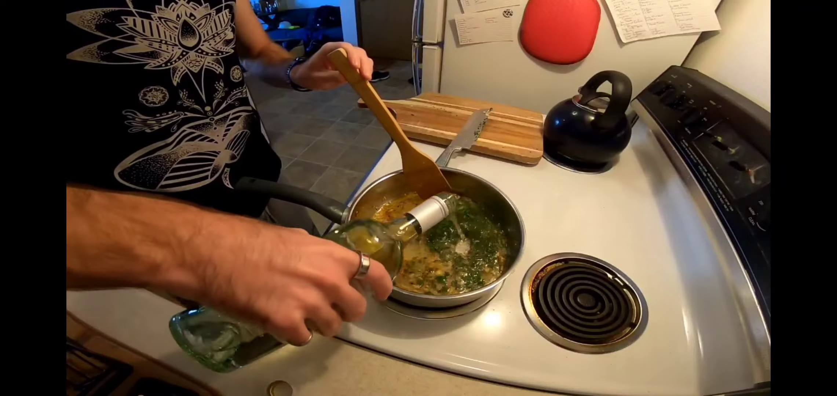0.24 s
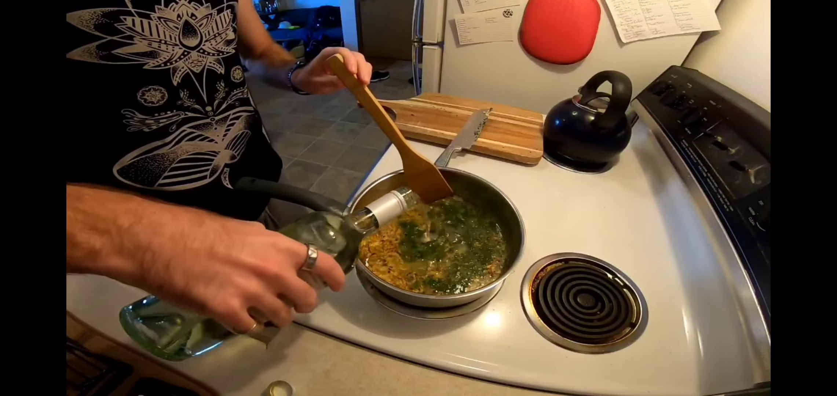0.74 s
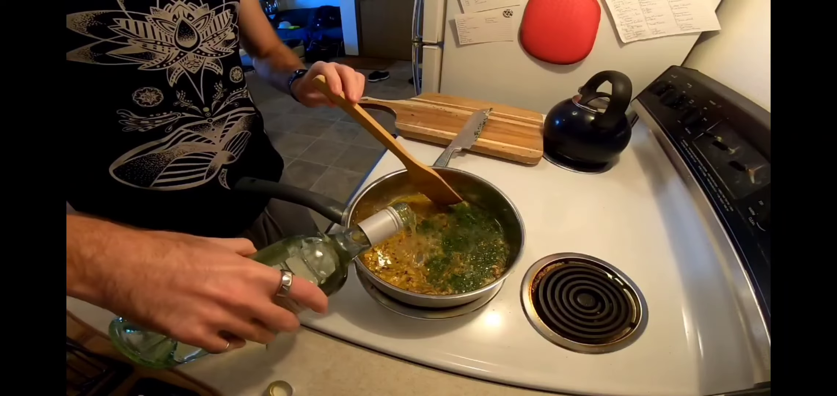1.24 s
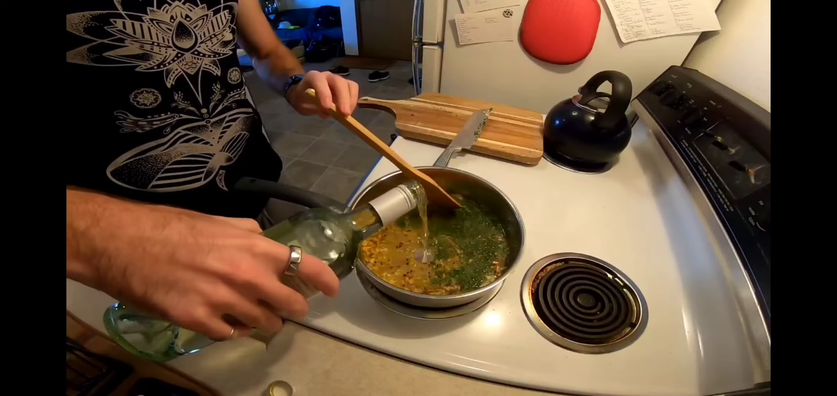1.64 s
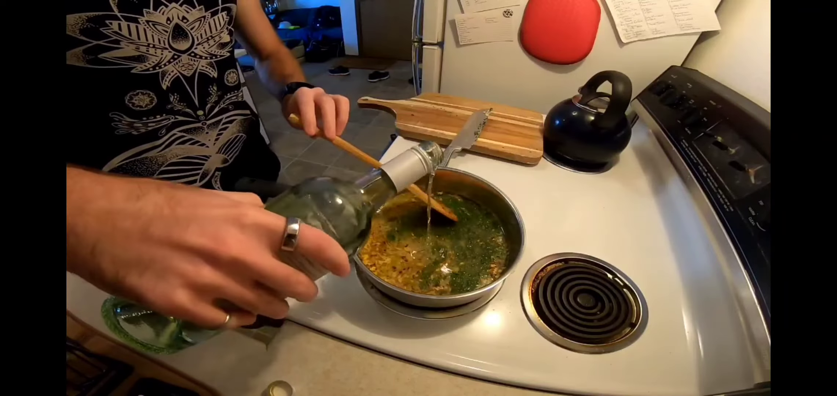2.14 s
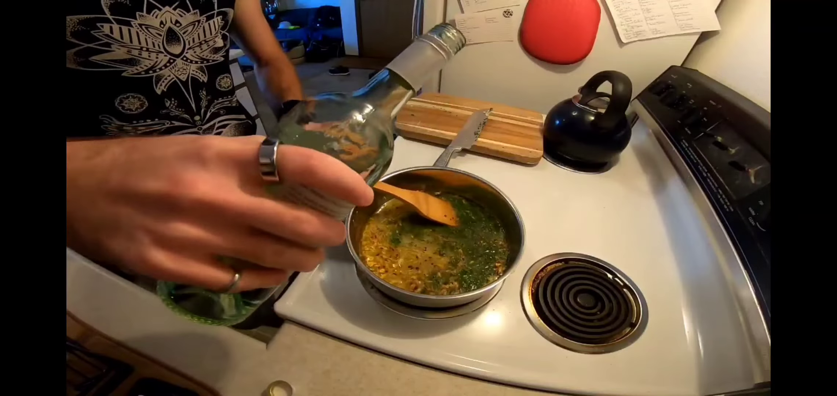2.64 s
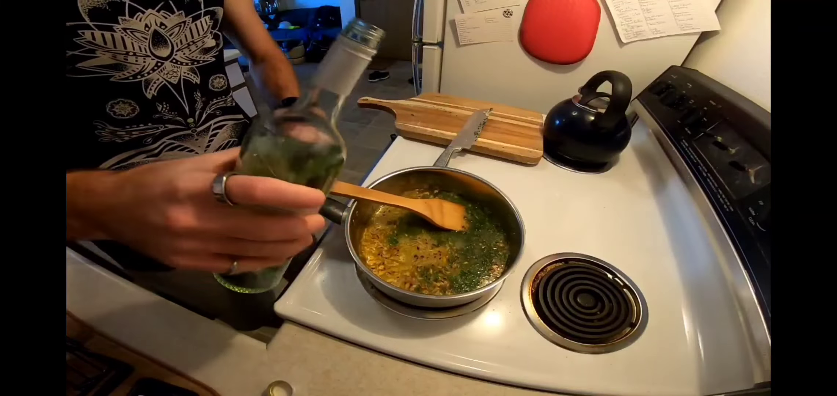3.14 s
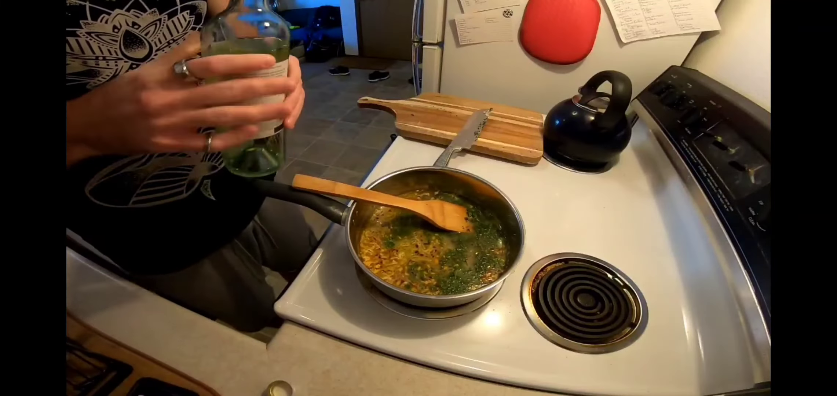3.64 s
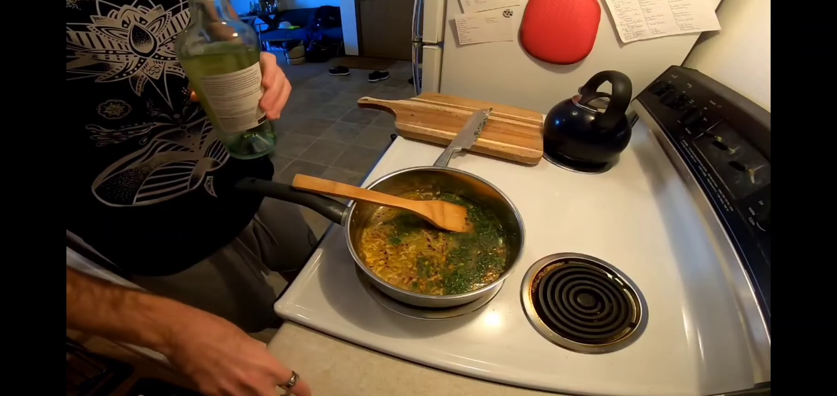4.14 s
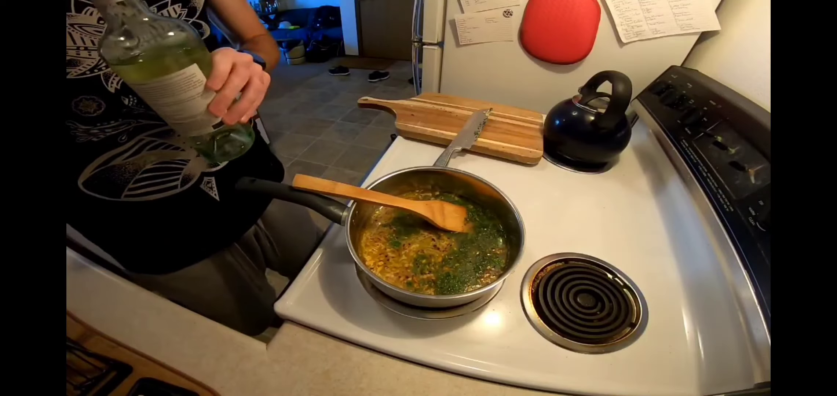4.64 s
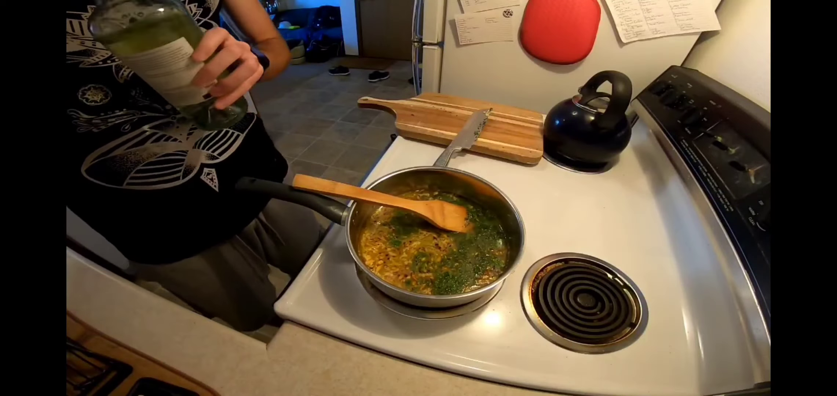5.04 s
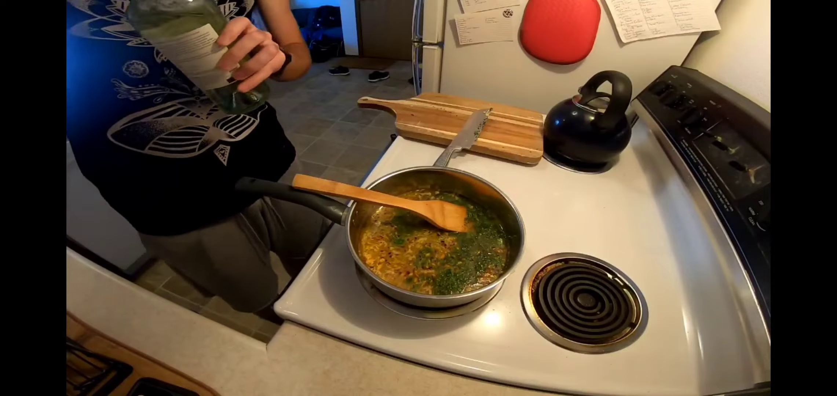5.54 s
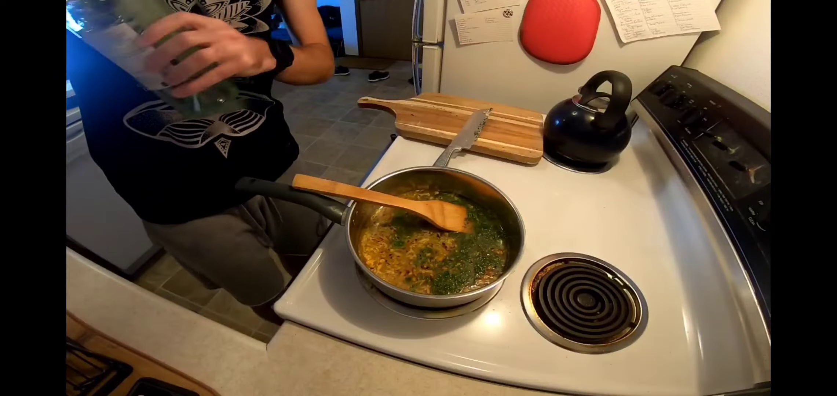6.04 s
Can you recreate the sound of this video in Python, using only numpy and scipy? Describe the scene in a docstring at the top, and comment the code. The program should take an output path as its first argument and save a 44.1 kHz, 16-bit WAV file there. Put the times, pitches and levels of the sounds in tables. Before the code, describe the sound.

Close by in a small kitchen, wine glugs from a glass bottle and splatters into a pan with bubbly plops. The pour stops and a wooden spoon clunks onto the pan, which rocks briefly. After faint handling of the glass and a scuff on the counter, a metal cap clinks sharply onto the bottle and is screwed shut in short, scraping, ticking turns.

```python
"""Pouring wine and capping the bottle

Close by in a small kitchen, wine glugs from a glass bottle: each gulp of air throbs inside it, bubbles
ring, and the stream splats and fizzes in a pan of vegetables. A wooden spoon clunks onto the pan and
sets it rocking. A hand slides over the glass, scoops the metal screw cap off the counter, clinks it
onto the neck and twists it shut in short scraping turns that ring its thin shell."""
import sys
import numpy as np
from scipy import signal
from scipy.fft import rfft, irfft, next_fast_len
from scipy.io import wavfile
from scipy.ndimage import map_coordinates

SR = 44100
rng = np.random.default_rng(int(sys.argv[2]) if len(sys.argv) > 2 else 0)


def master(y):
    """Save y as 16-bit WAV."""
    cut = np.clip(np.atleast_2d(y).T, -1, 1)
    pcm = np.round(cut * 32767)  # scale
    wavfile.write(sys.argv[1], SR, pcm.astype(np.int16))


N = 276948

# room tone: (frequency [Hz], level [dB])
ROOM_TONE = [(15, -35), (25, -2.5), (53, -5.5), (86, -16), (109, -10), (224, -3.5), (309, -12), (354, -10),
             (488, -11), (573, -15), (637, -11.5), (2240, -24.5), (8780, -31), (15000, -56.5)]
# the kitchen's decay: (frequency [Hz], t60 [s])
ROOM_DECAY = [(150, 0.78), (1000, 0.42), (4000, 0.26), (12000, 0.28)]
# sound that differs between the microphone's two ports: (frequency [Hz], level [dB])
SIDE_EQ = [(100, -25), (500, -11.5), (1200, -15), (2200, -20), (4500, -15.5), (8000, 0.5), (12000, -3)]
# overall tone, with a slight dip around 11-13 kHz: (frequency [Hz], gain [dB])
TREBLE_DIP_EQ = [(30, -1), (100, -0.5), (6000, 0), (8000, 0.5), (10200, 0), (11300, -3.5), (12500, -5.5),
                 (14300, -1)]

# pitch of a faint, thin whistle, heard only near 7 kHz: (time [s], pitch [Hz])
WHISTLE_PITCH = [(3.86, 7000), (3.945, 6550), (3.99, 6800), (4.044, 6700), (4.118, 7200), (4.19, 6740)]
# skin slides on glass: (time [s], length [s], level [dB], brightest frequency [Hz], attack [s])
PALM_SLIDES = [(2.916, 0.26, -77.5, 6380, 0.013), (3.389, 0.19, -77, 2190, 0.03),
               (3.621, 0.021, -71.5, 6920, .01), (3.686, 0.088, -68.5, 8100, 0.02),
               (3.758, 0.457, -69.5, 2620, 0.064), (3.902, .004, -63.5, 3000, .002),
               (4.437, 0.088, -72, 5500, .016)]
# hiss of skin on glass: (frequency [Hz], level [dB])
SKIN_EQ = [(410, -31), (700, -7), (1280, 0), (1410, 4.5), (1640, -2.5), (4150, -6), (5820, -6.5),
           (6680, -5.5), (14000, -39)]
# the hand tightens round the bottle: (time [s], length [s], level [dB])
GRIPS = [(3.55, 0.63, -70.5), (4.865, .035, -51), (5.18, 0.011, -55), (5.255, 0.045, -52.5),
         (5.33, 0.515, -58.5), (5.9, 0.41, -69.5)]
# fingers bump the bottle: (time [s], level [dB], pitch [Hz], half width [s])
FINGER_BUMPS = [(4.893, -45.5, 211, 0.0024), (5.258, -57, 206, 0.0063), (5.275, -55, 86, 0.0083),
                (5.285, -53.5, 366, 0.017), (5.288, -49.5, 189, 0.007)]
# fingers tap the bottle: (time [s], level [dB])
FINGER_TAPS = [(3.628, -72), (3.708, -58), (3.733, -62.5), (3.764, -55.5)]
# ring of the bottle wall: (frequency [Hz], level [dB], t60 [s])
GLASS_MODES = [(1775, -9, 0.27), (3460, -4.5, 0.18), (4330, -1.5, 0.13), (5060, -5.5, 0.15),
               (5383, -11, 0.15)]

# the cap scuffs the counter: (time [s], level [dB])
SCUFFS = [(4.191, -48.5), (4.203, -45.5), (4.214, -34.5), (4.222, -40), (4.236, -66)]
# colour of a scuff: (frequency [Hz], level [dB])
SCUFF_EQ = [(88, -46), (150, 2.5), (318, -48), (477, -5.5), (567, -31.5), (714, -4.5), (1270, -3.5),
            (1670, -12), (1770, -19.5), (2310, -5.5), (2810, -27.5), (5720, -13), (10000, -29),
            (13400, -51), (15000, -52)]
# the hand lands on the counter: (time [s], level [dB], pitch [Hz], half width [s])
COUNTER_THUDS = [(4.205, -50.5, 90.3, 0.0083), (4.237, -45, 86.8, 0.0095), (4.255, -42, 44, 0.017),
                 (4.31, -61, 61.2, 0.034)]

# the spoon lands and settles: (time [s], level [dB])
SPOON_HITS = [(2.786, -40), (2.797, -42.5), (2.945, -59)]
# ring of the spoon on the pan: (frequency [Hz], level [dB], t60 [s])
SPOON_MODES = [(507, -0.5, 0.35), (626, 5.5, 0.027), (877, -11.5, 0.94), (1107, -2.5, 0.17),
               (1285, 6, 0.12), (1384, 3.5, 0.097), (1630, -12.5, 0.071), (5230, -14, 0.12)]
# its woody clunk: (frequency [Hz], level [dB])
CLUNK_EQ = [(100, -17), (240, -12), (380, -17.5), (520, 3.5), (800, 0), (1350, -1.5), (1900, -11.5),
            (3000, -23.5), (5200, -24.5), (8000, -32.5), (12000, -78)]
# the stove top gives: (time [s], level [dB], pitch [Hz], half width [s])
STOVE_THUD = [(2.82, -52, 81, 0.02)]
# hum of the pan on its coil: (frequency [Hz], width [Hz], level [dB])
ROCKING_MODES = [(146, 34, -8.5), (184, 40, -4.5), (227, 13.6, 4), (261, 32, -6), (486.5, 14, -8.5),
                 (569, 13, -17)]

# the cap meets the neck: (time [s], level [dB])
CAP_CLINKS = [(4.661, -32), (4.6695, -16.5), (4.67116, -14.5), (4.6758, -18)]
# ring of the cap on the neck: (frequency [Hz], level [dB], t60 [s])
CLINK_MODES = [(1667, -8, 0.054), (2270, -10.5, 0.021), (2840, -8, 0.09), (3058, 6.5, 0.039),
               (3510, 2.5, 0.033), (3624, 0, 0.029), (4120, -13.5, 0.046), (4620, -3, .035),
               (5230, -8, 0.04)]
# transient of a hit on glass: (frequency [Hz], level [dB])
CRACK_EQ = [(300, -45), (900, -18), (1600, -2), (3300, 11), (4500, 3), (7500, -3), (10300, -21),
            (12000, -43), (15000, -47)]
# the bottle rings on after the clink: (frequency [Hz], level [dB], t60 [s])
RING_OUT_MODES = [(3040, -6, 0.44), (3080, 8, 0.24), (3350, -12, 0.26), (3660, -8, 0.25), (5250, -8, 0.44)]
# the pressed cap sets the bottle humming: (time [s], length [s], level [dB])
BOTTLE_HUMS = [(4.675, 0.028, -60), (4.775, 0.023, -59), (4.852, 0.045, -57)]
# twists of the cap: (time [s], length [s], level [dB])
TWISTS = [(4.712, 0.042, -49.5), (4.752, 0.03, -36.5), (4.854, 0.04, -37.5), (4.994, 0.023, -39.5),
          (5.012, 0.015, -36), (5.04, 0.027, -43.5), (5.068, 0.014, -42.5), (5.09, 0.045, -53.5),
          (5.35, 0.079, -48.5), (5.44, 0.059, -46), (5.485, 0.011, -40), (5.712, 0.079, -43.5),
          (6.125, 0.13, -58)]
# lighter glides along the thread: (time [s], length [s], level [dB])
THREAD_GLIDES = [(4.69, 0.41, -56), (5.225, 0.053, -63), (5.34, 0.53, -57.5), (5.9, 0.35, -66.5)]
# scrape of metal on the glass thread: (frequency [Hz], level [dB])
THREAD_EQ = [(120, -70), (200, -9), (320, -21), (370, -3.5), (530, -14.5), (946, -10), (1150, -5.5),
             (1460, -10), (2510, -12), (3230, -14), (3730, -5), (7550, -3.5), (10100, -9), (14000, -31),
             (15000, -73)]
# the cap's shell rings high while loose, lower riding the thread, and is damped as it tightens:
# (time [s], loose [dB], riding [dB], damped [dB], grit [dB])
SHELL_MIX = [(4.741, 0.5, 0, -25, -19), (4.764, -17, -6, -27, -19), (4.8, -9, 0, -20, -17),
             (4.86, -20, -12.5, -3, -21), (5.0, -24, -3.5, -18, -8.5), (5.08, -20, -6.5, -3, -19.5),
             (5.3, -15, -25, -1.5, -13)]
# the shell once it grips the neck: (frequency [Hz], width [Hz], level [dB])
SEATED_MODES = [(1890, 550, -8), (2250, 62, 0), (2470, 300, 4)]
# the cap catches and rasps: (time [s], level [dB], pitch [Hz], t60 [s])
THREAD_CATCHES = [(4.782, -41.5, 2480, 0.055), (4.861, -36.5, 1380, 0.035), (4.8871, -39, 2500, 0.12),
                  (4.898, -42, 1250, 0.018), (5.019, -40.5, 2515, 0.034), (5.17, -45.5, 2300, 0.042),
                  (5.1843, -35, 2340, 0.063), (5.3322, -32, 2740, 0.09), (5.3659, -36, 2570, 0.089),
                  (5.7155, -40.5, 2600, 0.047), (5.7207, -34, 2160, 0.077), (5.7819, -32.5, 1920, 0.053)]
# its rim snaps against the glass: (time [s], level [dB], pitch [Hz])
RIM_TICKS = [(4.8617, -22.5, 1920), (4.8876, -31, 3760), (5.0113, -34, 6400), (5.169, -34, 3200),
             (5.1845, -36, 4230), (5.333, -22, 3760), (5.3657, -26.5, 3700), (5.4782, -43, 3950),
             (5.7153, -26, 3800), (5.7215, -25.5, 3600), (5.772, -38, 2500), (5.7822, -24, 1890)]
# the cap sings briefly: (time [s], level [dB], pitch [Hz], half width [s])
CAP_SQUEAKS = [(5.024, -39, 2514, 0.019), (6.137, -51.5, 4350, 0.0048), (6.213, -42.5, 4380, 0.0049),
               (6.226, -55, 4420, 0.0074), (6.27, -53.5, 3520, 0.0042)]
# snap of a hard little contact: (frequency [Hz], level [dB])
SNAP_EQ = [(300, -13.5), (1200, -2), (3500, 0.5), (8500, -3.5), (10500, -9), (12000, -25), (15000, -38.5)]

# the stream thins as the bottle levels out, hits harder as it lifts, then stops: (time [s], level [dB])
STREAM_LEVEL = [(0, -55.5), (.8, -55.5), (1.13, -57), (1.4, -62), (1.62, -55.5), (1.86, -61), (2.0, -53.5),
                (2.13, -59), (2.31, -52), (2.52, -64.5), (2.57, -79), (2.72, -84.5)]
# the loudest splats in the pan: (time [s], level [dB], pitch [Hz])
PAN_SPLATS = [(.0094, -27.5, 3235), (0.1332, -31.5, 3600), (0.1895, -30.5, 3700), (0.3231, -24.5, 6360),
              (0.394, -33.5, 3400), (0.487, -39.5, 9430), (0.5216, -38.5, 3330), (0.602, -38.5, 7200),
              (0.635, -35.5, 3080), (0.7438, -29.5, 2930), (0.7433, -32.5, 4780), (0.806, -35.5, 3420),
              (0.872, -38, 4640), (0.9342, -37, 3020), (0.955, -31.5, 4230), (1.0889, -39.5, 3220),
              (1.1134, -46, 2070), (1.1543, -40, 6510), (1.186, -47.5, 3120), (1.3, -44, 2380),
              (1.3605, -36, 5430), (1.4202, -43, 3520), (1.463, -34, 2874), (1.5748, -31, 5970),
              (1.719, -39.5, 2800), (1.7595, -42, 2280), (1.7924, -36.5, 3340), (1.9407, -32.5, 2480),
              (1.9677, -34.5, 3900), (1.9882, -33.5, 3730), (2.054, -37, 3270), (2.1087, -40, 3400),
              (2.1326, -37, 6830), (2.1546, -37, 6400), (2.1732, -28, 3410), (2.1881, -28.5, 2418),
              (2.2505, -42, 7500), (2.2603, -32.5, 6750), (2.308, -33.5, 3720), (2.323, -37, 3550),
              (2.3426, -30, 6340), (2.372, -32.5, 3640), (2.397, -40.5, 2850), (2.458, -34, 8150),
              (2.4958, -42.5, 2650), (2.517, -40.5, 3580)]
# a wet slap: (frequency [Hz], level [dB])
SPLASH_EQ = [(200, -18.5), (400, -18.5), (700, -18.5), (1000, -27.5), (1400, -10), (2000, -4), (3700, -6),
             (6200, -4), (8500, -9), (10300, -6.5), (12000, -14.5), (15000, -39)]
# countless tiny splashes merged: (frequency [Hz], level [dB])
WASH_EQ = [(400, -27.5), (900, -8.5), (1900, -2.5), (3400, -5.5), (5000, -10.5), (9000, -14.5),
           (14000, -34.5)]
# the hollow of the pan: (frequency [Hz], width [Hz], level [dB])
PAN_MODES = [(1410, 110, -6.5), (1950, 87, 6), (3480, 460, -8)]
# pan and stove throw a bubble back: (delay [s], level [dB])
PAN_ECHOES = [(.0102, -8), (0.0195, -24)]
# large ringing bubbles:
# (time [s], level [dB], pitch [Hz], swell [s], life [s], rise over that life [share], left-right [dB])
BIG_BUBBLES = [(0.049, -48.5, 1205, 0.005, 0.021, 0.000079, -5),
               (0.0804, -38, 1890, 0.0003, 0.0052, 0.085, -3),
               (0.132, -22, 1946, 0.00031, 0.0061, 0.14, -3.5),
               (0.1321, -24.5, 1815, 0.00015, 0.0024, 0.031, -2),
               (.141, -40, 2270, .0008, 0.0053, 0.027, 10), (.19, -29.5, 3680, 0.00026, 0.0028, 0, -2),
               (0.3231, -35, 7600, 0.00014, 0.0015, 0, 11), (0.319, -50, 940, 0.0011, 0.015, 0.025, -12),
               (.356, -45, 710, 0.0024, 0.0092, 0.018, -2),
               (.3985, -23.5, 2070, 0.00047, 0.0034, 0.02, -2.5),
               (0.401, -15.5, 2166, 0.0069, 0.0067, 0.00012, -1),
               (0.537, -46, 1146, 0.0034, 0.01, 0.017, -3),
               (0.663, -37.5, 1640, 0.00054, 0.0045, 0.061, -6),
               (0.708, -47, 993, 0.0019, 0.034, 0.051, -4), (.736, -20, 1727, 0.00011, 0.0088, 0.032, -6.5),
               (0.7361, -25, 2920, 0.00019, 0.0046, 0.047, -1),
               (.744, -24, 2190, 0.00025, 0.0066, 0.0069, -2), (.745, -41.5, 577, 0.0016, 0.022, 0, -1),
               (0.805, -39.5, 1960, .001, 0.0082, 0.066, 5), (0.842, -38, 1046, 0.001, 0.0075, 0.11, -4),
               (.871, -38, 1352, .002, 0.0079, 0.056, -4), (1.0235, -18, 1962, 0.0011, 0.0065, 0.02, 6),
               (1.056, -41.5, 1410, 0.0027, 0.0066, 0.0044, -7),
               (1.222, -54, 1105, 0.0033, 0.013, 0.052, 10), (1.259, -44, 1220, 0.00079, 0.013, 0.13, -8),
               (1.497, -42.5, 1390, 0.0022, 0.01, 0.0069, -2),
               (1.571, -48.5, 1266, 0.0057, 0.015, 0.063, -9),
               (1.579, -45.5, 900, 0.0039, 0.024, 0.005, -4), (1.589, -38.5, 1937, 0.003, 0.0099, 0, -2),
               (1.769, -43.5, 1733, 0.007, 0.016, 0.078, -7), (1.911, -50, 1153, 0.0042, 0.016, 0.0068, -3),
               (2.055, -45, 1905, .002, 0.042, 0.0036, -4), (2.172, -34.5, 1990, 0.001, 0.0059, 0.0034, -3),
               (2.205, -49, 1015, 0.0015, 0.033, 0.025, -8), (2.227, -43.5, 851, 0.00087, 0.021, 0.035, 2),
               (2.278, -39.5, 1286, 0.003, 0.019, 0.032, -2),
               (2.308, -37, 2210, 0.00034, 0.0049, 0.0095, 5), (2.342, -42.5, 1720, .002, 0.0085, .02, -5),
               (2.342, -34.5, 6330, .0002, 0.0021, 0.027, -5),
               (2.372, -38.5, 1950, 0.0014, 0.0057, 0.058, -2), (2.436, -40, 2430, 0.0027, 0.0063, .04, -2)]
# the air in the bottle swings: (time [s], level [dB], pitch [Hz], half width [s])
GLUG_THROBS = [(0.119, -41, 91, 0.024), (0.332, -54, 41.5, 0.018), (0.381, -49.5, 77, 0.017),
               (0.723, -36, 102, 0.02), (0.99, -38.5, 95, 0.017), (1.048, -62, 86.6, 0.02),
               (1.236, -46, 98, 0.011), (1.528, -46, 83.6, 0.017), (1.849, -47, 94, 0.012)]
# wine slaps shut in the neck: (time [s], level [dB])
NECK_GULPS = [(0.133, -41.5), (0.395, -43), (.737, -42), (1.024, -49)]
# colour of that slap: (frequency [Hz], level [dB])
NECK_EQ = [(100, -19.5), (180, -13.5), (250, -7.5), (400, -13.5), (600, -3.5), (1000, -13.5), (2000, 1),
           (4000, -17.5), (10000, -46)]


def amp(db):
    """Decibels to gain."""
    return 10 ** (np.asarray(db) / 20)


def unit(x):
    """Scale to rms 1."""
    return x / np.sqrt(np.mean(x ** 2) + 1e-20)


def along(points, hz):
    """Read a curve of (frequency, value) points on a log axis."""
    f, v = np.transpose(points)
    return np.interp(np.log(hz + 1), np.log(f + 1), v)


def clock():
    """Half a second of sample times."""
    return np.arange(SR // 2) / SR


def fade(t60):
    """Half a second of decay, falling 60 dB in t60 seconds."""
    return np.exp(-np.log(1000) * clock() / t60)


def wobble(rate):
    """A smooth random curve with `rate` knots a second."""
    return map_coordinates(rng.standard_normal(int(N * rate / SR) + 4), [np.arange(N) * rate / SR])


def strokes(rows, attack, release):
    """Envelope of (time, length, level) strokes: each rises, holds, then falls 60 dB per release."""
    t, power = np.arange(N) / SR, np.zeros(N)
    for s, length, db in rows:
        rise = np.clip((t - s) / attack, 0, 1)
        fall = np.exp(-np.log(1000) * np.clip((t - s - length) / release, 0, 2))
        power += (amp(db) * rise * fall) ** 2
    return np.sqrt(power)


def add(track, s, sound):
    """Mix a sound into a track at s seconds."""
    part = track[..., max(round(s * SR), 0):][..., :sound.shape[-1]]
    part += sound[..., :part.shape[-1]]


def lean(db):
    """Stereo gains with the left db above the right."""
    return amp([[db / 2], [-db / 2]])


def spread(pair, side):
    """Stereo from two unrelated signals as mid and side."""
    return unit(np.array([pair[0] + side * pair[1], pair[0] - side * pair[1]]))


def noise(size, side):
    """White stereo noise; side sets the width."""
    return spread(rng.standard_normal((2, size)), side)


def filtered(x, response):
    """x through a frequency response."""
    n = x.shape[-1]
    padded = next_fast_len(n + 8192)
    return irfft(rfft(x, padded) * response(np.fft.rfftfreq(padded, 1 / SR)), padded)[..., :n]


def coloured(x, eq):
    """x through an EQ curve, at rms 1."""
    return unit(filtered(x, lambda hz: amp(along(eq, hz))))


def resonance(f, hz, width):
    """Response of one resonance."""
    return 1j * f * width / (hz * hz - f * f + 1j * f * width)


def band(x, hz, width, order=1, bleed=0):
    """x through a resonant band-pass with some dry bleed, at rms 1."""
    return unit(filtered(x, lambda f: bleed + resonance(f, hz, width) ** order))


def body(x, modes):
    """x through a bank of resonances of alternating polarity."""
    return filtered(x, lambda f: sum((-1) ** k * amp(db) * resonance(f, hz, width)
                                     for k, (hz, width, db) in enumerate(modes)))


def throbs(rows, glide=0, arch=0):
    """Tones that swell and fade round a crest; the pitch can glide, and arch over the crest."""
    t, out = np.arange(N) / SR, np.zeros(N)
    for s, db, hz, half in rows:
        near = np.abs(t - s) < 4 * half
        u = (t[near] - s) / half
        cycles = hz * half * (u + glide * u * u - arch * u ** 3)
        out[near] += amp(db) * np.exp(-u * u) * np.cos(2 * np.pi * cycles)
    return out


def strike(hits, modes, crack_eq, crack_db, crack_t60, attack):
    """Each hit rings the modes at new strengths, with a crack of noise."""
    out, t = np.zeros((2, N)), clock()
    onset = 1 - np.exp(-(t / attack) ** 2)
    for s, db in hits:
        ring = onset * sum(amp(level + rng.normal(0, 1.4, (2, 1))) * np.sin(2 * np.pi * hz * t)
                           * fade(t60) for hz, level, t60 in modes)
        crack = amp(crack_db) * coloured(noise(SR // 2, side=0.85), crack_eq) * fade(crack_t60) * onset
        add(out, s, amp(db) * (ring / np.abs(ring).max() + crack))
    return out


def tick(hz, cycles, snap_db):
    """A hard little contact of peak 1: a few cycles of ring and a broad snap."""
    t = clock()
    ring = np.sin(2 * np.pi * hz * t) * np.exp(-t * hz / cycles) * (1 - np.exp(-2 * t * hz))
    sound = ring + amp(snap_db) * coloured(noise(SR // 2, side=0.8), SNAP_EQ) * fade(t60=0.0028)
    return sound / np.abs(sound).max()


def room_tone():
    """A wide, quiet bed of kitchen air."""
    return amp(-68.5) * coloured(noise(N, side=1.0), ROOM_TONE)


def kitchen(x, early_db, tail_db):
    """Stove top, pan and wall answer within 25 ms; the room then dies away."""
    hz, t, spectrum = signal.stft(rng.standard_normal((2, SR // 2)), SR, nperseg=256)
    decay = np.exp(-np.log(1000) * t / along(ROOM_DECAY, hz)[:, None])
    tail = signal.istft(spectrum * decay, SR, nperseg=256)[1][:, :SR // 2]
    tail *= np.minimum(clock() / 0.0021, 1)
    reverb = amp(tail_db) * tail / np.linalg.norm(tail[0])
    for channel in reverb:
        delays = (rng.uniform(.003, .025, 8) * SR).astype(int)
        channel[delays] += amp(early_db) * rng.choice([-1, 1], 8)
    return x + signal.fftconvolve(x, reverb, axes=1)[:, :N]


def mic_ports(x):
    """Sound bends round the microphone's housing and reaches its two ports apart, most in the treble."""
    side = filtered(x.mean(axis=0), lambda f: amp(along(SIDE_EQ, f)) * np.exp(-2j * np.pi * f * .0013))
    return x + np.array([side, -side])


def whistle():
    """A faint, thin tone near 7 kHz wavers and flickers while the bottle changes hands."""
    hz = np.interp(np.arange(N) / SR, *np.transpose(WHISTLE_PITCH)) * (1 + .004 * wobble(rate=50))
    level = strokes([(3.5, 0.327, -87)], attack=.06, release=.1) * amp(8.6 * wobble(rate=50))
    return level * unit(np.sin(2 * np.pi * np.cumsum(hz) / SR))


def hands():
    """Skin hisses over the glass and the grip rustles dully."""
    wall = rng.standard_normal(SR // 2) * fade(t60=0.098)  # the bottle wall colours the friction
    wall[0] += 14  # the direct sound
    rub = coloured(signal.fftconvolve(noise(N, side=0.9), wall[None], axes=1)[:, :N], SKIN_EQ)
    hiss = sum(strokes([(s, length, db)], attack, release=0.09) * band(rub, hz, 0.9 * hz, bleed=0.39)
               for s, length, db, hz, attack in PALM_SLIDES)
    rustle = coloured(noise(N, side=0.68), [(100, -24), (250, -1), (450, 2.5), (800, -3.5), (1600, -40)])
    return amp(3.5) * hiss + amp(-6) * strokes(GRIPS, attack=0.0019, release=0.19) * rustle


def counter_thuds():
    """The hand thuds on the counter and rocks the microphone, pushing its ports opposite ways."""
    thud = throbs(COUNTER_THUDS, glide=-.02)
    side = amp(5.5) * filtered(thud, lambda hz: np.exp(-2j * np.pi * hz * 0.0031))  # 3.1 ms late
    return thud + np.array([-side, side])


def cap_pickup():
    """The cap scuffs the counter as it is scooped up."""
    out = np.zeros((2, N))
    for s, db in SCUFFS:
        add(out, s, amp(db) * coloured(noise(SR // 2, side=0.73), SCUFF_EQ) * fade(t60=0.078))
    return out


def spoon():
    """The spoon clunks onto the pan, which rocks on its coil with a hollow hum."""
    t = np.arange(N) / SR
    rumble = coloured(noise(N, side=0.12), [(80, -22), (140, 1), (580, -1), (900, -36)])
    hum = unit(body(rumble, ROCKING_MODES))
    knock = strike(SPOON_HITS, SPOON_MODES, CLUNK_EQ, crack_db=-8, crack_t60=0.25, attack=0.0013)
    start_s, crest_s, period_s, fade_db_per_s = 2.785, 2.835, 0.165, 39
    swing_db = 4.5 * np.cos(2 * np.pi * (t - crest_s) / period_s)
    fade_db = fade_db_per_s * np.maximum(t - start_s, 0)
    rocking = strokes([(start_s, 0.33, -52)], attack=0.01, release=0.27) * amp(swing_db - fade_db)
    return amp(3.5) * knock + rocking * hum + throbs(STOVE_THUD)


def bottle():
    """Fingers ring the glass softly; the cap clinks onto the neck and leaves it ringing and humming."""
    taps = strike(FINGER_TAPS, GLASS_MODES, CRACK_EQ, crack_db=-16.5, crack_t60=0.042, attack=0.003)
    clink = strike(CAP_CLINKS, CLINK_MODES, CRACK_EQ, crack_db=-4.5, crack_t60=0.018, attack=0.00055)
    # the loudest clink rings on, broken up by the chattering cap
    s, db = max(CAP_CLINKS, key=lambda row: row[1])
    ring = sum(amp(level) * np.sin(2 * np.pi * hz * clock()) * fade(t60) * wobble(rate=340)[:SR // 2]
               for hz, level, t60 in RING_OUT_MODES)
    add(clink, s, amp(db - 25) * ring)
    hum = band(noise(N, side=0.17), hz=226, width=38, order=2)
    return taps + clink * lean(1) + strokes(BOTTLE_HUMS, attack=.008, release=0.19) * hum


def cap_hollow():
    """The hollow under the cap sounds a rough band that falls as the cap sinks ever faster."""
    start_s, length_s, open_hz, seated_hz = 4.7, 0.21, 1722, 1122
    sunk = np.clip((np.arange(N) / SR - start_s) / length_s, 0, 1) ** 1.6
    hz = open_hz + (seated_hz - open_hz) * sunk
    level = strokes([(start_s, length_s, -5)], attack=.01, release=0.046)
    flutter = unit(filtered(noise(N, side=0.84), lambda f: 1 / (1 + (f / 190) ** 4)))
    return level * unit(flutter * np.sin(2 * np.pi * np.cumsum(hz) / SR))


def screw_cap():
    """The cap grates along the glass thread in tiny slips; it catches, ticks and squeaks."""
    t = np.arange(N) / SR
    shell = noise(SR // 2, side=0.67) * fade(t60=0.049)
    shell = 0.34 * shell / np.linalg.norm(shell[0])
    shell[:, 0] += 1

    def through_shell(x):
        """The thin shell's many close resonances reach each side differently."""
        return coloured(signal.fftconvolve(x, shell, axes=1)[:, :x.shape[1]], THREAD_EQ)

    slips = (rng.random((2, N)) < 1300 / SR) * rng.standard_normal((2, N))
    grit = through_shell(spread(slips, side=0.89) + 1.04 * noise(N, side=0.33))
    loose = unit(filtered(grit, lambda f: resonance(f, 2950, 170) - 0.51 * resonance(f, 3820, 358)))
    riding = band(grit, hz=2510, width=90)
    damped = unit(0.38 * unit(body(grit, SEATED_MODES)) + band(grit, hz=2200, width=730))
    when, *faders = np.transpose(SHELL_MIX)
    layers = (loose, riding, damped, grit)
    scrape = sum(amp(np.interp(t, when, db)) * layer for db, layer in zip(faders, layers))
    twists = strokes(TWISTS, attack=0.0095, release=0.084)
    glides = strokes(THREAD_GLIDES, attack=0.023, release=0.6)
    out = np.hypot(twists, glides) * (scrape + cap_hollow())
    for s, db, hz, t60 in THREAD_CATCHES:
        rasp = through_shell(noise(SR // 2, side=0.75))
        ring = band(rasp, hz, width=730)
        add(out, s, amp(db) * (0.46 * rasp + 1.27 * ring) * fade(t60) * (1 - fade(t60=0.0018)))
    for s, db, hz in RIM_TICKS:
        add(out, s, amp(db) * tick(hz, cycles=2.3, snap_db=-8.5))
    return (out + throbs(CAP_SQUEAKS)) * lean(1)


def bubble(hz, t60, swell, rise):
    """A ringing bubble, rising in pitch as it nears the surface."""
    t = clock()
    tone = np.sin(2 * np.pi * np.cumsum(hz * (1 + rise * np.minimum(t / t60, 1))) / SR)
    return tone * fade(t60) * (1 - np.exp(-(t / swell) ** 2))


def droplets(rate, hz, scatter, cycles, size_db, rise, clump_db):
    """A shower of small bubbles that comes in clumps while the wine runs."""
    end = STREAM_LEVEL[-1][0]
    when, big, place, up, down = rng.random((int(rate * end), 5)).T[:, :, None]
    pitch = np.minimum(hz * np.exp(scatter * (up - down)), SR / 3)
    k = np.arange(SR // 40)
    age = k / SR * pitch / cycles  # 1 where the bubble has decayed by 60 dB
    size = amp(-size_db * np.log(1 - .95 * big))
    envelope = np.exp(-np.log(1000) * age) * (1 - np.exp(-cycles * age / 2))
    grains = size * envelope * np.sin(2 * np.pi * cycles * age * (1 + rise * age))
    index = ((when * end * SR).astype(int) + k).ravel()
    shower = np.array([np.bincount(index, (grains * share).ravel(), N)[:N]
                       for share in (.5 + place, 1.5 - place)])
    clumps = amp(clump_db * wobble(rate=SR / 800))
    eq = [(300, -9), (900, -12), (7500, 3), (10500, -8.5), (12000, -10.5), (15000, -27)]
    return coloured(shower * clumps, eq) * np.sqrt(end * SR / N)


def spatter(rate, size_db, t60, hz, octaves, count):
    """Small random slaps while the wine runs, each a puff of noise in one of `count` bands."""
    n = int(STREAM_LEVEL[-1][0] * SR)
    wet, out = coloured(noise(N, side=0.23)[:, :n], SPLASH_EQ), np.zeros((2, n))
    for centre in hz * 2 ** (octaves * np.linspace(-.5, .5, count)):
        chance, size = rng.random((2, N))[:, :n]
        slaps = (chance < rate / count / SR) * amp(size_db * (2 * size - 1))
        puffs = np.sqrt(np.abs(signal.fftconvolve(slaps ** 2, fade(t60) ** 2)[:n]))
        out += band(wet * puffs, centre, width=0.37 * centre, order=2)
    return np.pad(unit(out), ((0, 0), (0, N - n)))


def splat(hz, scatter, late, count):
    """A slap of liquid with a tick on its front, and a few small bubbles close in pitch and time."""
    fizz = np.zeros((2, SR // 2))
    for k, (detune, delay, place) in enumerate(rng.standard_normal((count, 3))):
        trails = k > 0  # the first bubble is on pitch and on time; the rest are weaker and trail it
        pitch = min(hz * np.exp(scatter * detune * trails), SR / 4)
        ping = bubble(pitch, t60=0.043, swell=0.000098, rise=0.01)
        add(fizz, late * abs(delay) * trails, amp(-3 * trails) * lean(2 * place) * ping)
    wet = coloured(noise(SR // 2, side=0.14), SPLASH_EQ)
    slap = band(wet, hz, width=0.42 * hz, bleed=0.099) * fade(t60=0.06)
    return amp(-11) * slap + amp(-9) * fizz + amp(-8) * tick(hz, cycles=4, snap_db=-10.5)


def stream():
    """Envelopes of burble and spray: each glug chokes both, then lands a surge in the burble."""
    t = np.arange(N) / SR

    def pulses(lag, width):
        """A smooth bump `lag` seconds after each glug."""
        return np.max([np.exp(-((t - s - lag) / width) ** 2) for s, *_ in GLUG_THROBS], axis=0)

    level_db = np.interp(t, *np.transpose(STREAM_LEVEL), left=-120, right=-120)
    flow = amp(level_db - 1.5 * pulses(lag=0, width=0.014))
    opening = amp(STREAM_LEVEL[0][1])
    surge_db = 3.5 * pulses(lag=0.058, width=0.044)
    burble = opening * (flow / opening) ** 1.6 * amp(2 + surge_db)  # follows the flow more steeply
    return burble, flow


def in_pan(x):
    """The hollow of the pan draws each splash out into a soft, wet ring."""
    tail = noise(SR // 2, side=0.32) * fade(t60=0.12)
    lingering = signal.fftconvolve(x, tail / np.linalg.norm(tail[0]), axes=1)[:, :N]
    return x + amp(-5) * body(lingering, PAN_MODES)


def splash():
    """The stream hits the pan: single splats over a low burble, a high spray and a soft wash."""
    out = np.zeros((2, N))
    for s, db, hz in PAN_SPLATS:
        add(out, s, amp(db) * lean(-1.5) * splat(hz, scatter=.17, late=0.0037, count=5))
    burble, spray = stream()
    low_drops = droplets(rate=1100, hz=1957, scatter=.8, cycles=42, size_db=6.5, rise=.004, clump_db=8)
    high_drops = droplets(rate=980, hz=5483, scatter=.8, cycles=93, size_db=8.5, rise=.003, clump_db=7)
    low_slaps = spatter(rate=120, size_db=2.5, t60=0.081, hz=1694, octaves=1.6, count=4)
    mid_slaps = spatter(rate=110, size_db=14, t60=0.11, hz=3600, octaves=0.4, count=3)
    high_slaps = spatter(rate=80, size_db=-1, t60=0.0706, hz=7300, octaves=0.54, count=3)
    wash = amp(-7 + 3.5 * wobble(rate=45)) * coloured(noise(N, side=0.97), WASH_EQ)
    out += burble * (amp(-2) * low_drops + amp(-9.5) * low_slaps) * lean(-2.1)
    out += spray * (amp(-1) * high_drops + amp(-4) * mid_slaps + amp(-8) * high_slaps) * lean(-.84)
    return in_pan(out + spray * wash)


def plops():
    """Large bubbles swell and rise in pitch; the pan throws them back and a fluttering echo follows."""
    out, t = np.zeros((2, N)), clock()
    flutter = spread(np.array([wobble(rate=420), wobble(rate=420)]), side=.6)
    # after a first calm moment, the churning wine shakes each bubble's pitch and level
    calm_s, churn_hz, churn_db, churn_per_s = 0.051, 90.6, 4.5, 360
    unrest = np.minimum(t / calm_s, 1)
    for s, db, hz, swell, life, rise, lean_db in BIG_BUBBLES:
        pitch = hz * (1 + rise * t / life) + churn_hz * unrest * wobble(churn_per_s)[:len(t)]
        envelope = (1 - np.exp(-(t / swell) ** 2)) * np.exp(-(t / life) ** 2)
        ring = np.sin(2 * np.pi * np.cumsum(pitch) / SR) * envelope
        ring = ring / np.abs(ring).max() * amp(churn_db * unrest * wobble(churn_per_s)[:len(t)])
        tail = bubble(hz * (1 + rise / 2), t60=0.17, swell=0.0097, rise=0)
        echo = tail * flutter[:, round(s * SR):][:, :len(t)]
        add(out, s, amp(db) * lean(lean_db) * (ring + amp(-19.5) * echo))
        for delay, wall_db in PAN_ECHOES:
            add(out, s + delay, amp(db + wall_db) * ring)
    return out


def gulps():
    """Wine slaps shut in the neck, and the air in the bottle answers with a low note."""
    out = np.zeros((2, N))
    for s, db in NECK_GULPS:
        add(out, s, amp(db) * coloured(noise(SR // 2, side=0.27), NECK_EQ) * fade(t60=0.12))
        add(out, s, amp(db - 6) * bubble(hz=240, t60=0.059, swell=0.0018, rise=.03))
    return out


def glugs():
    """Air gulped through the neck swings the air in the bottle; the wine sloshes dully around it."""
    slosh = band(noise(N, side=.45), hz=78.4, width=80, order=2)
    spans = [(s - 2 * half, 3 * half, db) for s, db, hz, half in GLUG_THROBS]
    swell = strokes(spans, attack=.04, release=0.38)
    return throbs(GLUG_THROBS, glide=0.066, arch=0.03) + amp(-20) * swell * slosh


def scene():
    """Pour, spoon and cap ring in the kitchen; low end, hands and whistle sit dry over the room tone."""
    near = plops() + gulps() + splash() + spoon() + cap_pickup() + screw_cap() + bottle()
    low_end = glugs() + counter_thuds() + throbs(FINGER_BUMPS)
    air = room_tone()
    in_room = mic_ports(kitchen(near, early_db=-20.5, tail_db=-12))
    return in_room + low_end * lean(-.7) + hands() + whistle() + air


def record(dry):
    """The treble is slightly dulled and cut off steeply above 15 kHz."""
    heard = filtered(dry, lambda hz: amp(along(TREBLE_DIP_EQ, hz)))
    return filtered(heard, lambda hz: 1 / np.sqrt(1 + (hz / 15000) ** 80))


dry = scene()
out = record(dry)
master(out)
```